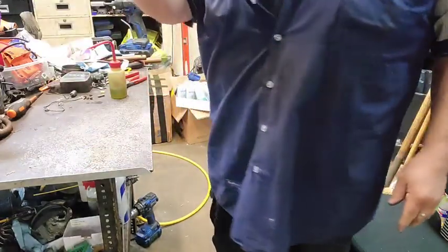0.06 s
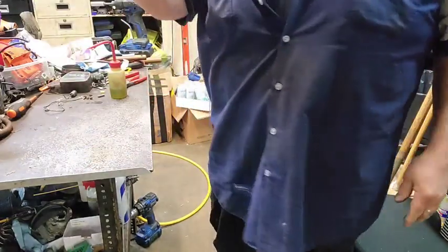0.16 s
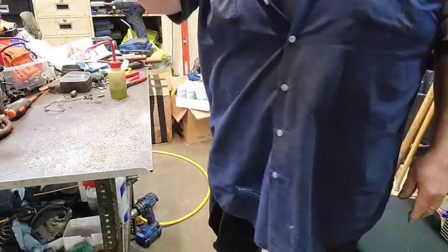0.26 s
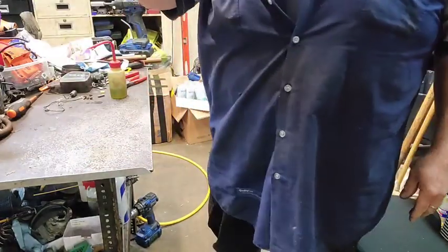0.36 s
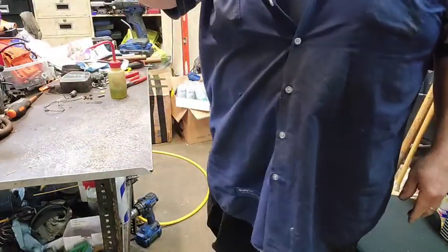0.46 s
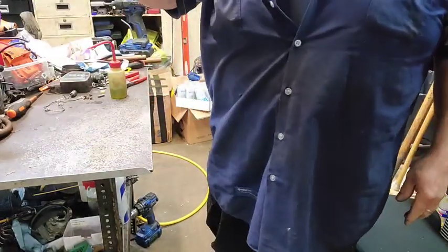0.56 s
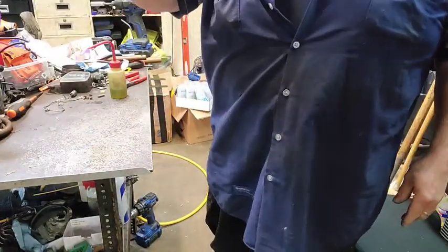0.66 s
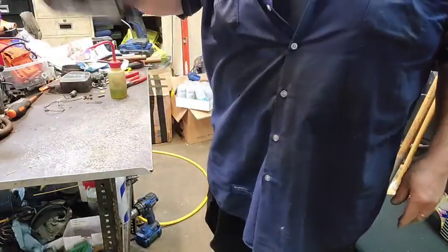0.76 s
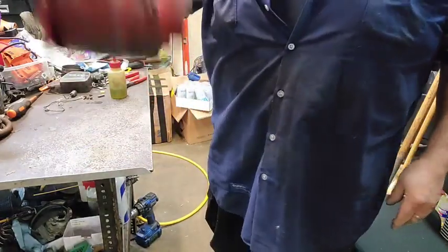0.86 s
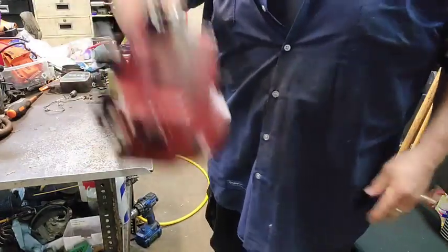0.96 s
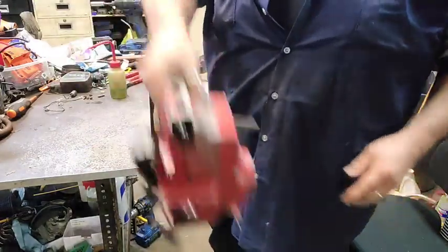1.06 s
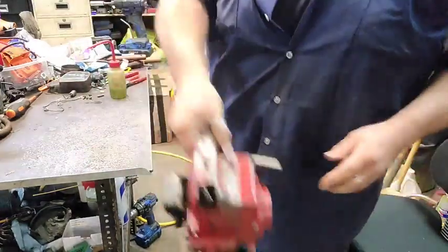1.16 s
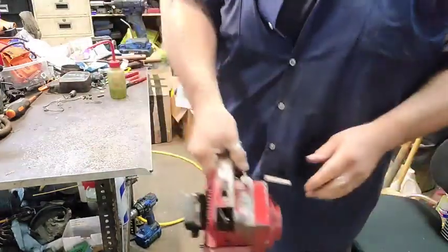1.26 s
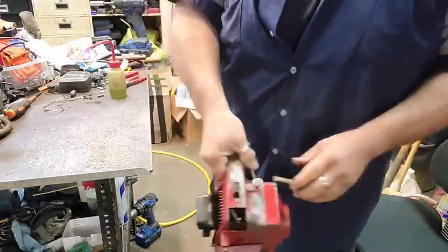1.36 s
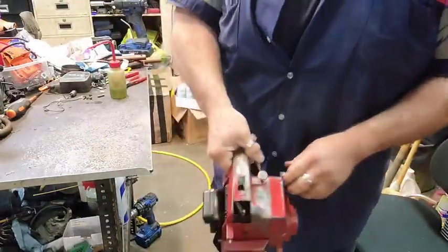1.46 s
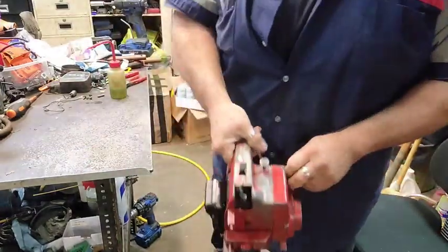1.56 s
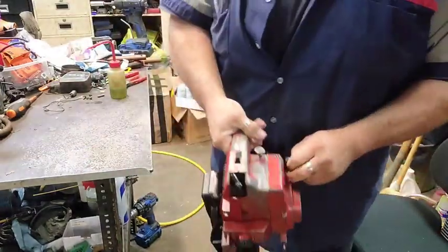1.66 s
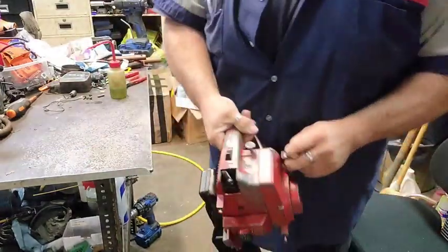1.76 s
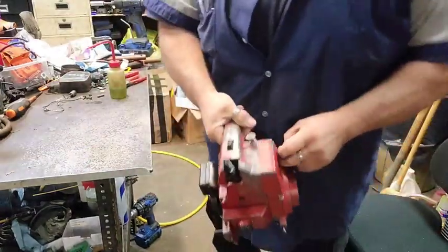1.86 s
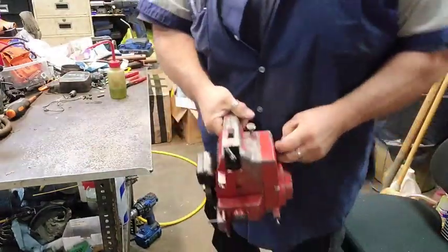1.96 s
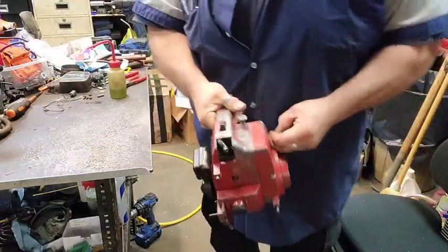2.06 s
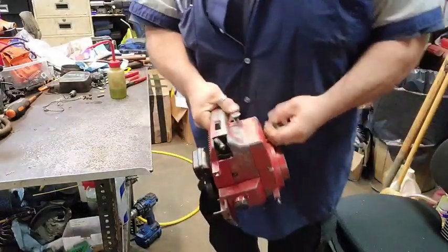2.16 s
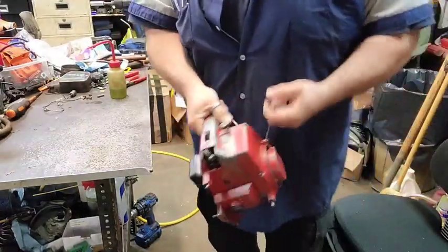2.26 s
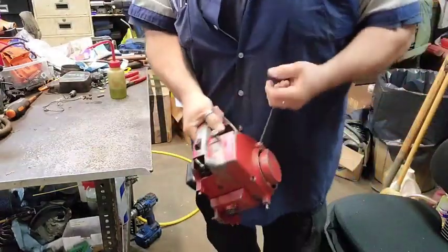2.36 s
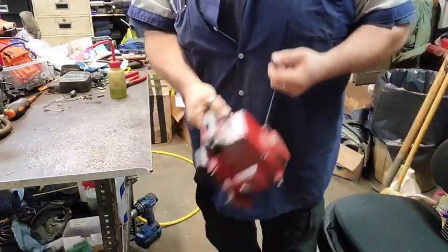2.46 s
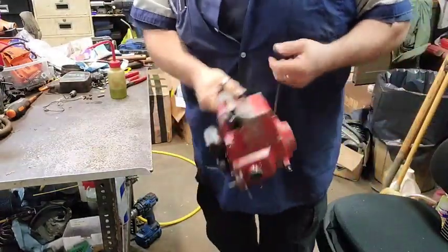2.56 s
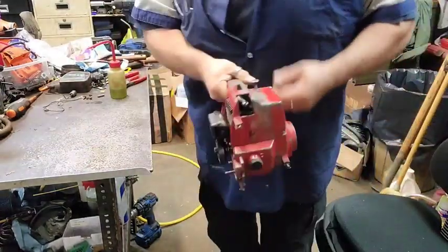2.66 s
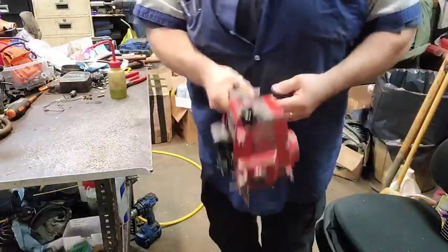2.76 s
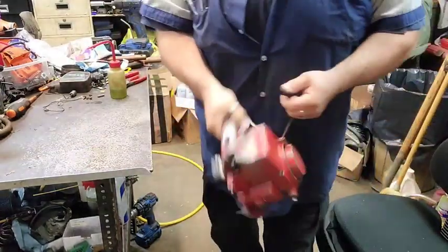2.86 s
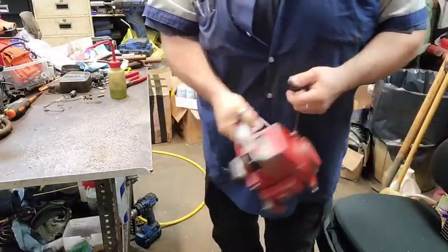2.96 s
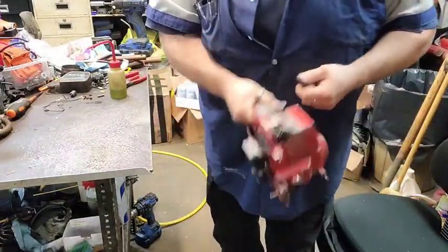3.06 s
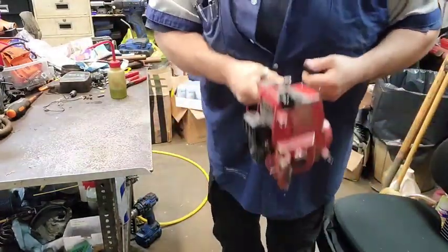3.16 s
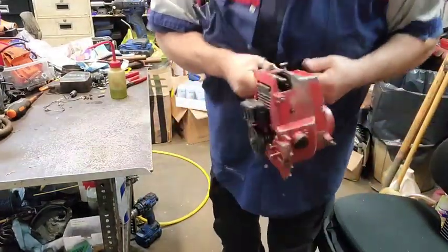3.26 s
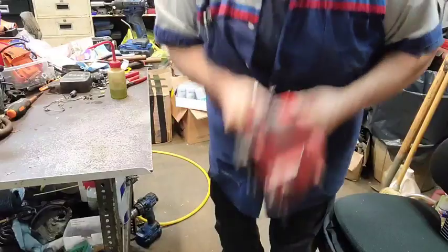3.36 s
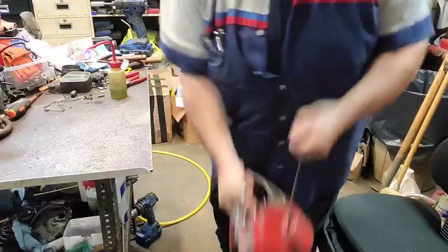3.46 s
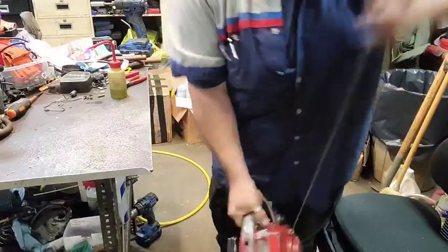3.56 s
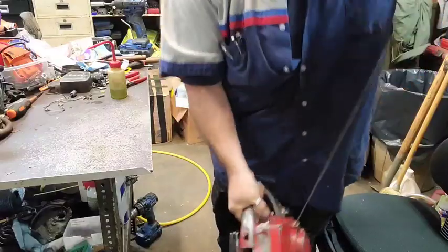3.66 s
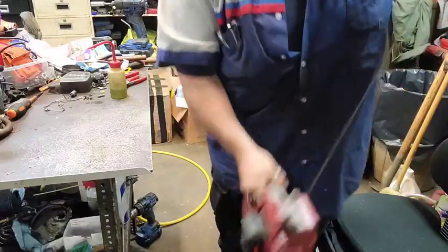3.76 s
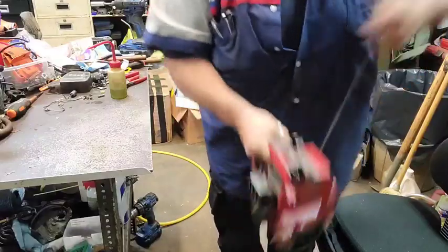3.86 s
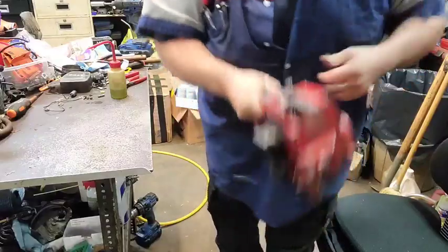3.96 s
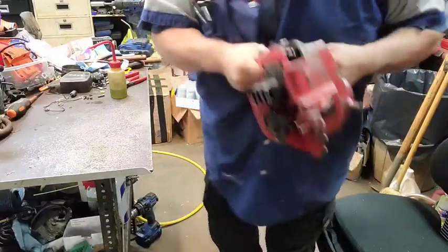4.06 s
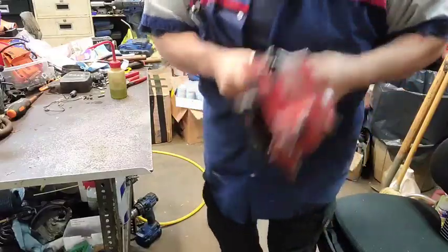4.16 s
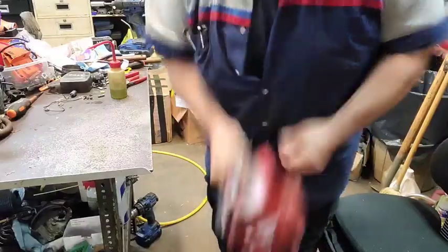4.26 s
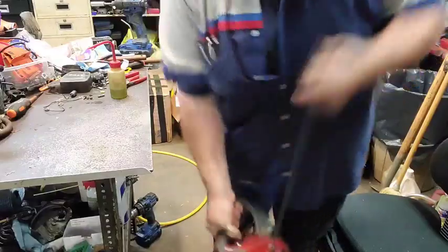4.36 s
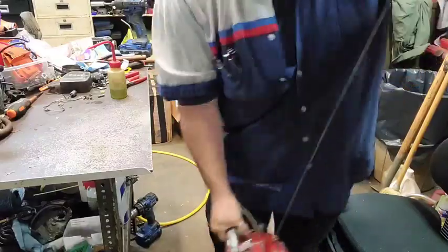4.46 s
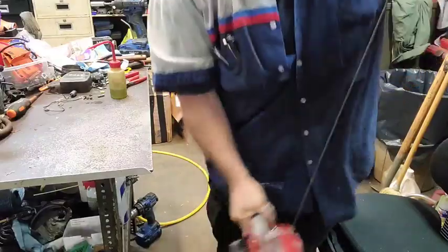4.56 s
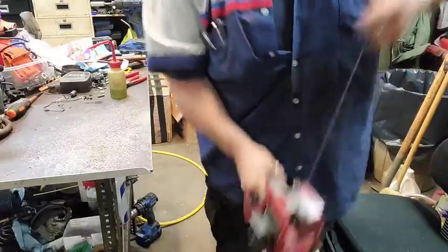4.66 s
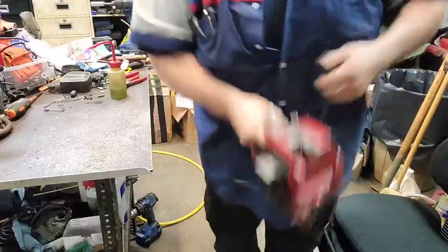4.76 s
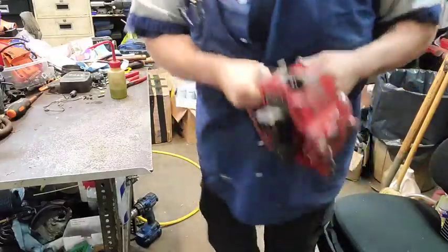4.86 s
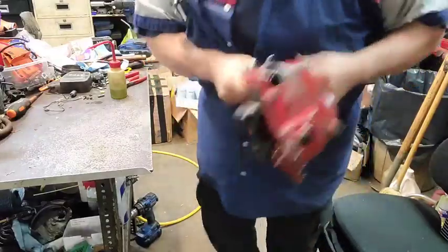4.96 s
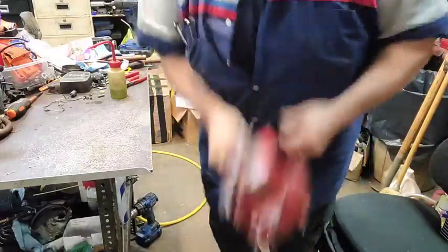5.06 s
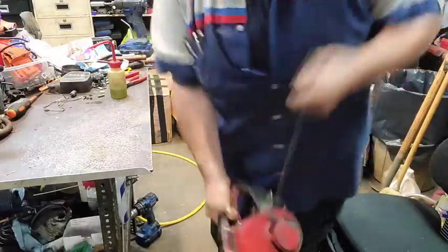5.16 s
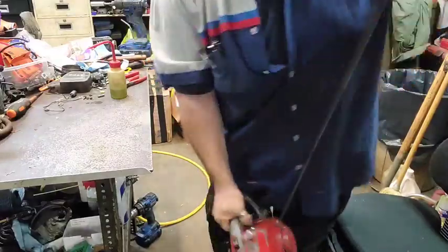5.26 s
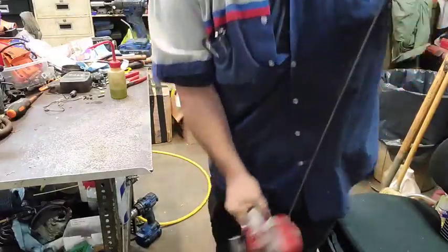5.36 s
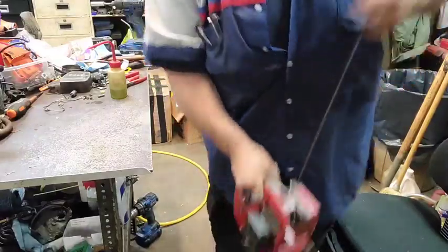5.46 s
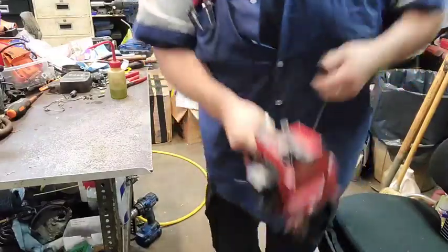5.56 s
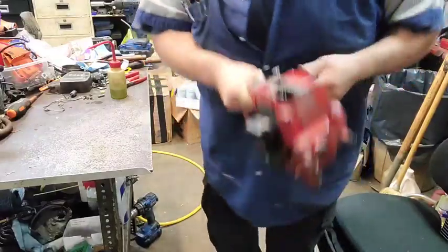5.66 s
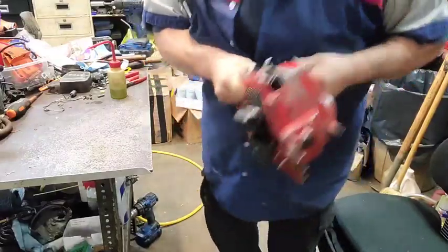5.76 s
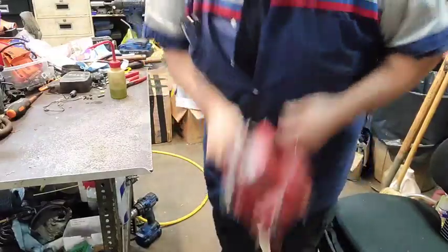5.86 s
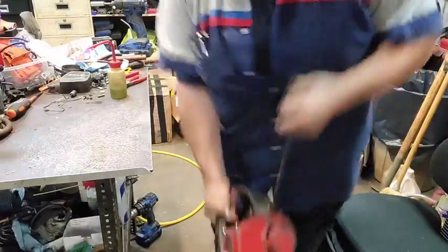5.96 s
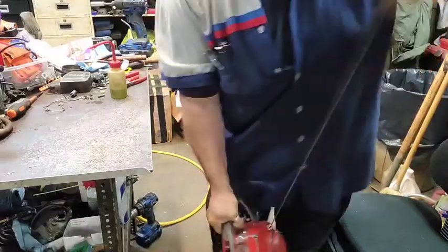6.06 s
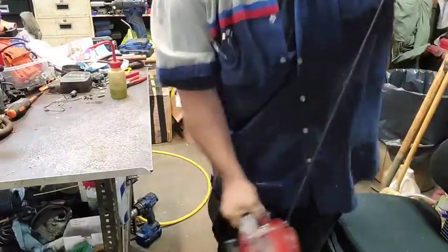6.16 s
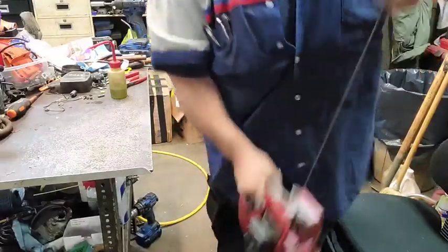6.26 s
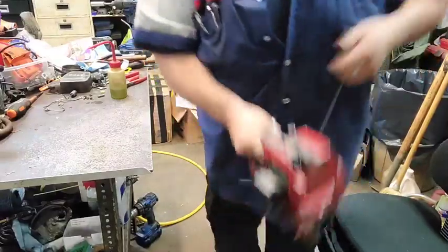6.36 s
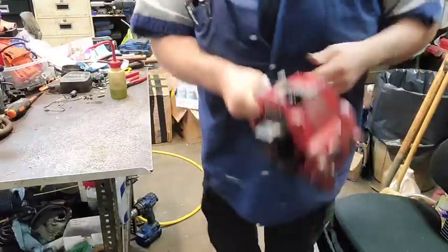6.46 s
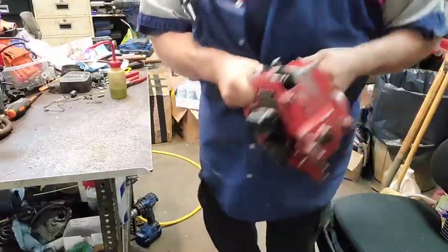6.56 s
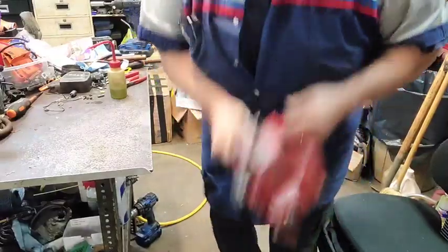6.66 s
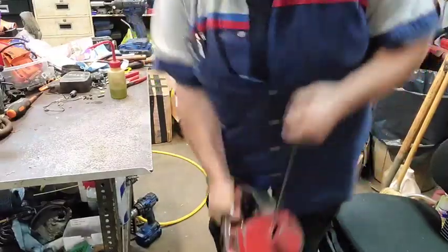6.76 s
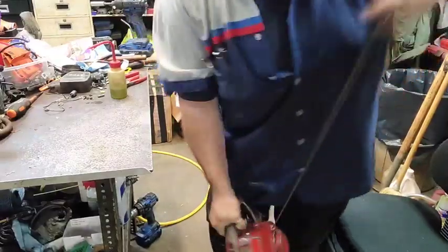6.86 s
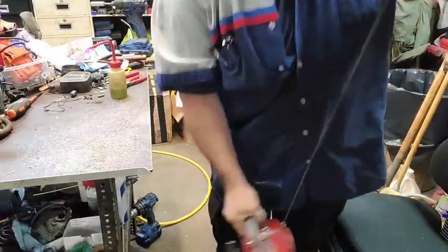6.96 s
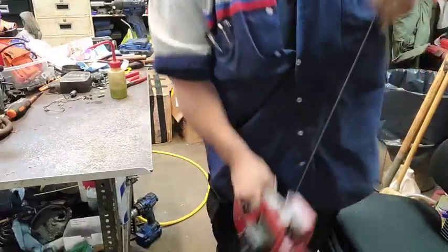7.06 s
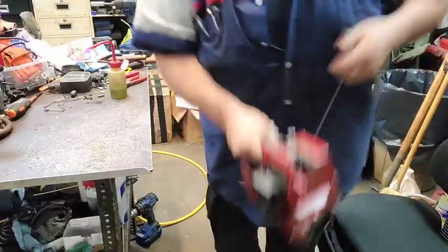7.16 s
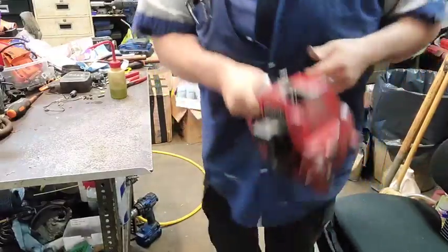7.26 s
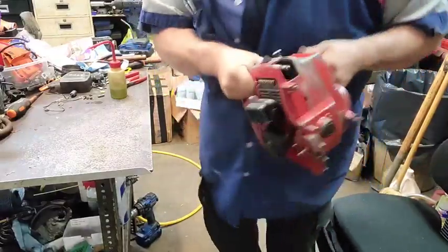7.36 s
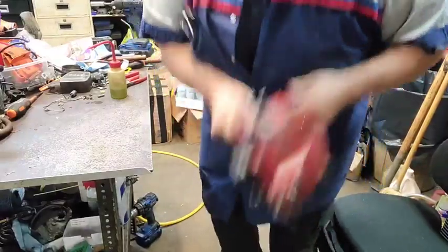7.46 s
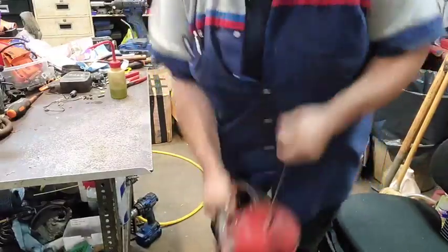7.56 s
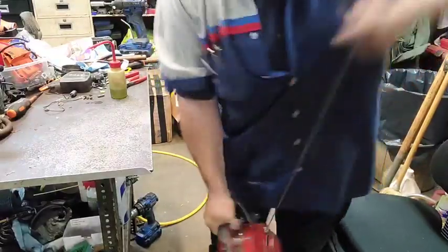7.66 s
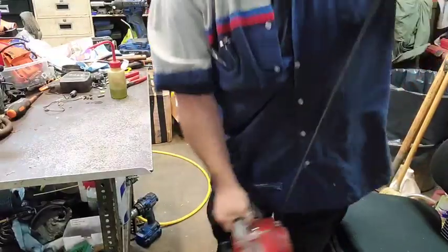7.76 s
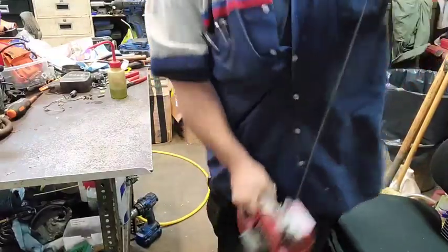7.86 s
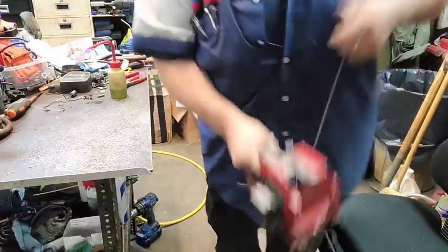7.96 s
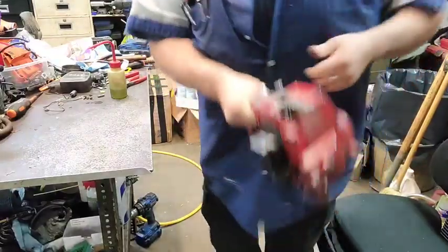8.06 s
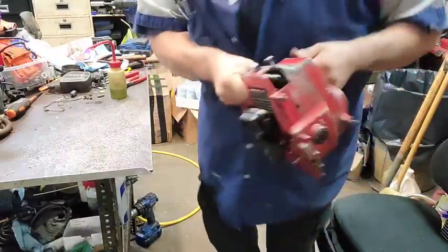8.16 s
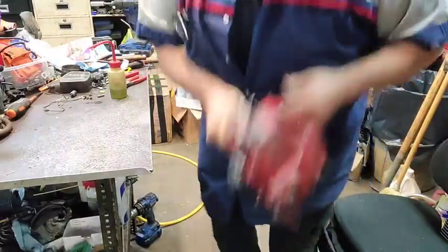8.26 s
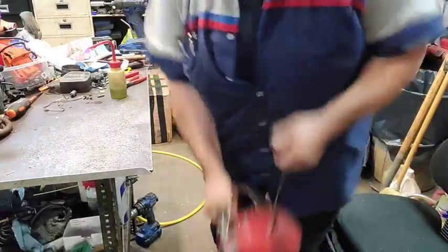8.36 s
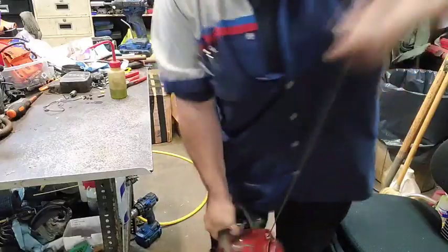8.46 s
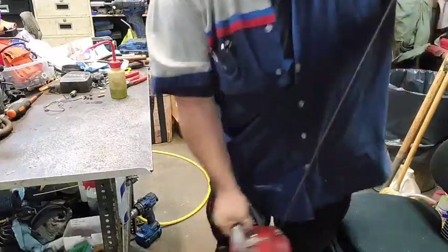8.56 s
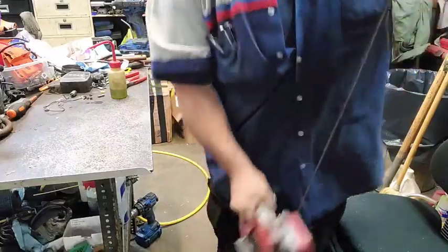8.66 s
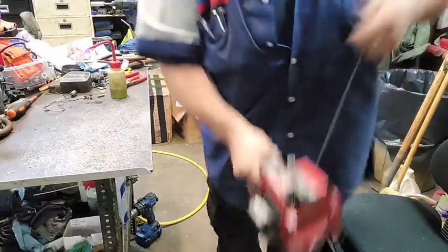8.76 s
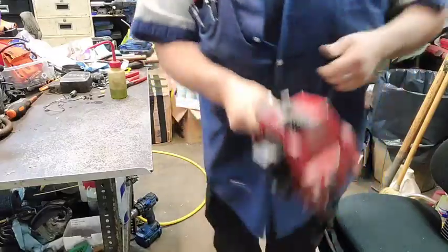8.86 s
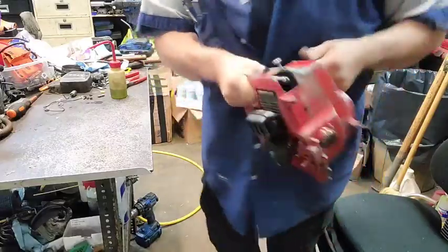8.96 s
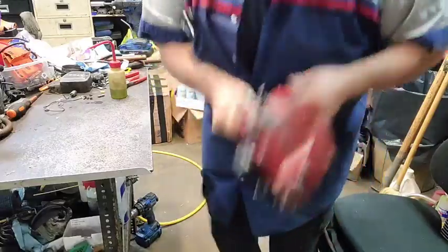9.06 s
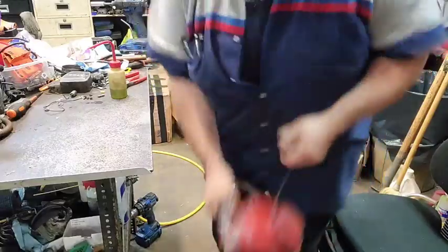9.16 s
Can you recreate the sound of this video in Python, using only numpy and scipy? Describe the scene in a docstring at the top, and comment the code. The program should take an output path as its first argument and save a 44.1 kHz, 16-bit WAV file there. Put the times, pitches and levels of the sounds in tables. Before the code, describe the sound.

A small two-stroke saw is yanked on its starter cord seven times in a workshop, clattering, chuffing and rewinding, but never starts.

```python
"""Cord-started saw, seven failed pulls

A small two-stroke saw in a workshop is pulled over seven times by its starter cord and never keeps running.
Noise bursts ring the casting and cover (knocks, reel rattle); shaped pulses ring the muffler (chuffs).
Swelling tones are whines, short sines are cord slaps; hum and room noise lie beneath.
Echoes, scatter and a workshop tail carry the saw to two microphone ports."""
import sys
import numpy as np
from scipy import signal
from scipy.fft import rfft, irfft, next_fast_len
from scipy.io import wavfile

SR = 44100
rng = np.random.default_rng(int(sys.argv[2]) if len(sys.argv) > 2 else 0)


def output_pcm(signal):
    """Save a mono or channel-first signal as 16-bit PCM at the path in sys.argv[1].

    Samples are clipped to [-1, 1] before scaling.
    """
    pcm = np.clip(np.atleast_2d(signal).T, -1, 1) * 32767
    wavfile.write(sys.argv[1], SR, np.round(pcm).astype(np.int16))


N = 406602
TIME = np.arange(N) / SR

# hum lines: pitch_hz, level_db
HUM_LINES = [(58.5, -46), (84.3, -52)]
# room noise spectrum: freq_hz, relative_density_db
AIR_SPECTRUM = [(25, -6), (45, -1.5), (120, -7), (350, -8.5), (700, -12), (1050, -19.5), (4000, -26),
                (10000, -42.5), (13000, -36), (16000, -32.5)]
# left-right likeness of the room noise: freq_hz, likeness_0_to_1
AIR_LIKENESS = [(60, 1), (400, 0.64), (1200, 0)]
AIR_DB = -47.5

# knocks of pawls, handle and housing: time_s, relative_level_db, brightest_ring_hz
KNOCK_EVENTS = [(0.115, -43, 2200), (0.157, -15.5, 5200), (1.0764, -46, 3000), (1.285, -51, 3000),
                (1.81, -41, 2700), (2.3109, -8, 6970), (2.44, -25.5, 1780), (2.59, -41.5, 2480),
                (2.765, -6, 6840), (2.9195, -5, 2630), (3.4308, -13.5, 3390), (3.5212, -9.5, 6650),
                (3.5587, -7.5, 4870), (3.587, 1, 7560), (3.6983, 3.5, 7720), (3.821, -10.5, 6860),
                (3.8946, -25, 5970), (3.919, -23, 7000), (3.941, -9, 6660), (4.0236, -8.5, 6440),
                (4.1265, -13.5, 6200), (4.147, -16, 2980), (4.369, -3, 6350), (4.4022, -12, 4930),
                (4.427, 2.5, 7590), (4.525, -0.5, 7220), (4.692, -4, 6700), (4.7245, -14, 6600),
                (4.7472, -8, 7250), (4.8196, -14, 6600), (4.8606, -13.5, 6440), (4.9636, -30.5, 5000),
                (5.025, -18.5, 6800), (5.1547, -20.5, 3100), (5.204, -7.5, 5500), (5.217, -6, 7640),
                (5.351, 0, 7600), (5.527, -15.5, 5770), (5.5707, -17.5, 6540), (5.6083, -11.5, 3280),
                (5.6395, -10, 6750), (5.687, -12, 6500), (5.72, -17.5, 6650), (5.787, -14.5, 6680),
                (5.965, -22.5, 6440), (6.025, -16.5, 6380), (6.0408, -3, 6840), (6.0736, 0.5, 7230),
                (6.154, 2.5, 7830), (6.2917, -9, 6600), (6.3274, -13, 6640), (6.4063, -17, 6500),
                (6.533, -16, 3820), (6.588, -12.5, 3760), (6.792, -9.5, 6850), (6.8485, 0.5, 7400),
                (6.9662, 4, 7580), (7.1586, -27, 6460), (7.206, -19.5, 6600), (7.357, -12.5, 6760),
                (7.4386, -12, 7060), (7.6045, -22, 6200), (7.651, -16.5, 6300), (7.668, -6, 6140),
                (7.6968, 0.5, 7300), (7.7704, 3.5, 7700), (7.9129, -12, 6770), (8.0714, -12, 6100),
                (8.1274, -11.5, 6170), (8.2135, -14.5, 6460), (8.4132, -5.5, 7100), (8.4645, 2.5, 7330),
                (8.5796, 4.5, 7630), (8.7187, -10, 6240), (8.762, -10.5, 6400), (8.839, -18, 6150),
                (8.8922, -6, 5410), (9.0117, -12, 6830)]
KNOCK_T60_S, SQUEAK_T60_S = 0.11, 0.14
# rings of the casting: pitch_hz, width_hz, relative_level_db
CASTING_RINGS = [(3087, 91, -3.5), (3925, 28, -2.5), (5450, 53, -6), (6740, 310, -9.5), (7600, 240, -12),
                 (7840, 110, -13), (12640, 810, -16.5), (14280, 260, -16.5)]
# broad colour between the casting rings: freq_hz, gain_db
SCRAPE_SPECTRUM = [(710, -36.5), (1200, -1), (2360, -5.5), (3100, -4), (4210, 0.5), (7270, 0), (9760, -32),
                   (14600, -12), (16300, -17)]
# rings of the hollow starter cover: pitch_hz, width_hz (knocks and chuffs widen it), relative_level_db
COVER_RINGS = [(630, 20, -19.5), (704.4, 29.6, 0), (857, 94, -3.5), (1019, 54, -6.5), (1125, 11, -1.5)]

# reel spring winds the cord back, the first only slack: release_s, fastest_s, rattle_then_db, handle_home_s
REEL_REWINDS = [(2.613, 2.727, -40, 2.72), (3.822, 3.95, -20, 4.21), (4.694, 4.754, -24.5, 5.02),
                (5.49, 5.638, -23.5, 5.75), (6.291, 6.43, -21.5, 6.48), (7.148, 7.266, -23, 7.335),
                (7.911, 8.018, -25.5, 8.05), (8.727, 8.845, -22, 9)]
SPIN_UP_DB_PER_S, RUN_DOWN_DB_PER_S = 100.5, 104.5
# cord drawn out: pawls_catch_s, rattle_db, pops_db
CORD_DRAWS = [(3.53, -29, -5), (4.38, -30, -7.5), (5.211, -26.5, -6.5), (6.033, -28.5, -8),
              (6.807, -31.5, -7.5), (7.661, -29, -8.5), (8.422, -38, -8)]
DRAW_S, SETTLE_DB_PER_S = 0.16, 164  # steady while the arm travels, then it dies
# cord and spring snag now and then
SNAGS_PER_S, SNAG_DECAY_S, SNAG_DB = 70, 0.003, 5

# swells of thin metallic tones: time_s, level_db, pitch_hz
WHINE_SWELLS = [(2.811, -44.5, 3920), (4.621, -37, 5460), (5.501, -36, 5520), (5.898, -50, 5400),
                (7.089, -39.5, 5480), (7.42, -45, 3940), (7.86, -54, 5480), (8.562, -31, 5525),
                (8.66, -39.5, 5480)]

# one row a pull: first_compression_s, speed_turns_per_s, arm_push_(turns/s)^2_per_turn,
# cord_length_turns, compressions_count
CRANK_PULLS = [(3.5752, 25.51, 534, 1.77, 7), (4.4279, 29.57, 446.5, 2.79, 8),
               (5.2515, 28.04, 316.7, 2.22, 7), (6.0592, 29.53, 392, 2.25, 7),
               (6.8696, 29.01, 370.8, 2.13, 7), (7.6833, 30.12, 474.7, 1.49, 8),
               (8.4855, 30.33, 381.6, 2.18, 6)]
DRAG_PER_TURN, SLOWEST_TURNS_PER_S = 294, 12.13  # drag in (turns/s)^2
REFERENCE_TURN_S = 0.027
SLOW_DB_PER_HALVING = 5.5  # a slow crank pops less
LEAK_DB, LEAKS_FROM = 10.5, 2.7  # a crawling one leaks: dB per reference turn, beyond this many
GAS_DB, JOLT_DB = 0.5, -2.5  # escaping gas; cover jolted by each chuff
# muffler rings: pitch_hz, width_hz, relative_level_db
MUFFLER_RINGS = [(86.6, 17, -1.5), (121, 49, -1), (177, 18, -6), (313, 27, -20), (440, 113, -0.5),
                 (568, 102, -4), (957, 16, -17)]

# slack cord slaps the hollow cover: time_s, level_db, pitch_hz
CORD_SLAPS = [(3.944, -12.5, 1067), (4.805, -21.5, 896), (8.894, -21, 1000)]
SLAP_S = 0.018

# reflections off body, bench, floor and walls: delay_s, signed_gain
EARLY_ECHOES = [(.003, 0.22), (.005, 0.2), (.0099, 0.2), (0.013, 0.11), (0.018, -.15), (.0225, -0.18)]
# workshop decay: freq_hz, t60_s
SHOP_DECAY = [(150, 0.19), (2000, 0.43), (16000, 0.25)]
# level difference of the saw between ports: freq_hz, left_minus_right_db
SAW_BALANCE = [(60, -1.5), (950, -1.5), (15000, 3.5)]
PORT_LAG_S = 0.00012  # the saw reaches the left port first
EDGE_HZ = 15790


def gain_of(db):
    """Amplitude factor for a level in dB."""
    return 10 ** (np.asarray(db) / 20)


def evened(x):
    """Scales to rms 1."""
    return x / np.sqrt(np.mean(x ** 2) + 1e-20)


def read(points, hz):
    """Interpolates a table over log frequency."""
    f, value = np.transpose(points)
    return np.interp(np.log(hz + 1), np.log(f + 1), value)


def add(mix, s, sound):
    """Adds a sound into the mix at s seconds."""
    part = mix[round(s * SR):][:len(sound)]
    part += sound[:len(part)]


def resonate(x, hz, width_hz):
    """One two-pole ring of gain 1 at its centre."""
    return signal.lfilter(*signal.iirpeak(hz, hz / width_hz, SR), x)


def ring_bank(x, rings, widen=1.0):
    """Parallel two-pole rings, the modes of one part."""
    return sum(gain_of(db) * resonate(x, hz, widen * width) for hz, width, db in rings)


def coloured(x, points, lag_s=0.):
    """Applies a spectrum in dB and a small delay."""
    size = next_fast_len(N + 4096)
    hz = np.fft.rfftfreq(size, 1 / SR)
    delay = np.exp(-2j * np.pi * hz * lag_s)
    return irfft(rfft(x, size) * gain_of(read(points, hz)) * delay, size)[:N]


def drift(per_s):
    """Slow random wander of rms 1, fading above per_s Hz."""
    hz = np.fft.rfftfreq(N, 1 / SR)
    return evened(irfft(rfft(rng.standard_normal(N)) / (1 + (hz / per_s) ** 4), N))


def background():
    """Wavering hum lines of a machine over soft room noise, partly alike at the two ports."""
    frames, hz = N // 512 + 5, np.fft.rfftfreq(2048, 1 / SR)
    a, b, c, d = rng.standard_normal((frames, 1025, 4)).T
    left, other = a + 1j * b, c + 1j * d
    same = np.clip(read(AIR_LIKENESS, hz), 0, 1)[:, None]
    z = np.array([left, same * left + np.sqrt(1 - same ** 2) * other])
    z *= gain_of(read(AIR_SPECTRUM, hz))[:, None] * gain_of([[[-.8]], [[.8]]])
    air = gain_of(AIR_DB) * evened(signal.istft(z, nperseg=2048, noverlap=1536)[1][:, :N])

    lag_s = np.array([[.0005], [0]])  # the hum reaches the right port first
    hum = np.zeros((2, N))
    for pitch_hz, db in HUM_LINES:
        level = gain_of(db + 1.1 * drift(1.4)) * np.sqrt(2)
        cycles = pitch_hz * (TIME - lag_s) + 0.017 * drift(1.9) + rng.random()
        hum += level * np.sin(2 * np.pi * cycles)
    return air + hum * gain_of([[-1.2], [1.2]])


def casting(x, rings_db=8, flash_db=4.0):
    """Metal body: broad scrape with rings above; each ring flashes as contacts wander over the part."""
    rings = np.zeros(N)
    for hz, width, db in CASTING_RINGS:
        rings += gain_of(db) * resonate(x * gain_of(flash_db * drift(8.5)), hz, width)
    return coloured(x, SCRAPE_SPECTRUM) + gain_of(rings_db) * rings


def knocks():
    """A soft onset, a sharp crack and a dying burst of contacts ring casting and cover; one ring is local."""
    t = np.arange(-600, SR // 4) / SR
    after = np.maximum(t, 0)
    tick, near = np.zeros((2, N))
    noise = rng.standard_normal((len(KNOCK_EVENTS), len(t)))
    for (s, db, hz), n in zip(KNOCK_EVENTS, noise):
        t60_s, rise_s = (SQUEAK_T60_S, .005) if hz > 7100 else (KNOCK_T60_S, .0006)
        lead_in = .05 * np.exp(t / .004)
        rise = np.where(t < 0, lead_in, np.minimum(.05 + t / rise_s, 1))
        decay = 0.45 * gain_of(-60 * after / t60_s) + 0.6 * np.exp(-after / 0.0014)
        blow = gain_of(db) * decay * rise * n
        solid = np.clip((8200 - hz) / 1800, .15, 1)  # the shrillest are pawl squeaks that barely shake the body
        width_hz = 900 + 900 * solid ** 2  # a solid blow is a broad crack
        add(tick, s + t[0], solid * blow)
        damped = blow * gain_of(-solid * 610 * after)
        local = resonate(resonate(damped, hz, width_hz), hz, width_hz)
        half_pitch = 1.06 * (1 - solid) * resonate(blow, hz / 2, 160)
        add(near, s + t[0], local + half_pitch)
    bare_contact = signal.lfilter(*signal.butter(2, (700, 16000), "band", fs=SR), tick)
    cover = ring_bank(tick, COVER_RINGS, 2.64)
    body = casting(tick, rings_db=5, flash_db=6.5)
    return gain_of(-4.5) * body + gain_of(4.5) * near + gain_of(-14.0) * bare_contact + gain_of(2.5) * cover


def rattle():
    """Gain of the reel noise, and how near (0-1) the returning handle is to home."""
    level, late = np.zeros((2, N))
    for start, db, _ in CORD_DRAWS:
        attack = np.clip((TIME - start) / 0.0048, 0, 1)
        settling_s = np.clip(TIME - start - DRAW_S, 0, 1)
        level += attack * gain_of(db - SETTLE_DB_PER_S * settling_s)
    for start, fastest, db, home in REEL_REWINDS:
        on = np.clip(np.minimum(TIME - start, home - TIME) / 0.004, 0, 1)
        slope = np.where(TIME < fastest, SPIN_UP_DB_PER_S, RUN_DOWN_DB_PER_S)
        level += on * gain_of(db - slope * np.minimum(abs(TIME - fastest), 1))
        late += on * np.clip(1 - (home - TIME) / .25, 0, 1)
    return level, late


def starter():
    """Uneven ticks of reel, spring and cord, in clumps and snags; the cover rings lower near the handle's home."""
    level, late = rattle()
    sizes = gain_of(1.08 * np.minimum(rng.exponential(1, N), 5))
    ticks = sizes * rng.choice([-1, 1], N) * (rng.random(N) < 1500 / SR)
    snags = gain_of(SNAG_DB + 0.73 * rng.standard_normal(N)) * (rng.random(N) < SNAGS_PER_S / SR)
    snags = signal.lfilter([1], [1, -np.exp(-1 / (SNAG_DECAY_S * SR))], snags)
    grain = evened(evened(ticks) + .5 * rng.standard_normal(N))
    drive = level * grain * gain_of(1.76 * drift(27)) * evened(1 + snags)
    thumps = drive * gain_of(3.7 * drift(78))
    cover = np.zeros(N)
    for hz, width, db in COVER_RINGS:
        tilt_db = 29 * (late - 1.03) * np.log2(hz / 900)
        cover += gain_of(db) * resonate(thumps * gain_of(4.1 * drift(7.1) - tilt_db), hz, width)
    return gain_of(4.0) * casting(drive) + gain_of(10.5) * cover


def whine():
    """Narrow, slightly rough tones under soft swells: noise through two sharp rings."""
    t, out = np.arange(-.25, .25, 1 / SR), np.zeros(N)
    noise = rng.standard_normal((len(WHINE_SWELLS), len(t)))
    for (s, db, hz), n in zip(WHINE_SWELLS, noise):
        tone = evened(resonate(resonate(n, hz, 35), hz, 35))
        add(out, s + t[0], gain_of(db) * np.exp(-(t / 0.05) ** 2) * tone)
    return out


def chuffs():
    """Time_s, turn_s and pop_db of each compression: the arm feeds the crank, compression drains it."""
    out = []
    for (first, speed, push, cord, count), (_, _, db) in zip(CRANK_PULLS, CORD_DRAWS):
        k = np.arange(count - 2)
        gained = push * np.maximum(1 - (k / cord) ** 2, 0) - DRAG_PER_TURN
        speed_squared = speed ** 2 + np.cumsum(np.r_[0, gained])
        turn_s = 1 / np.sqrt(np.maximum(speed_squared, SLOWEST_TURNS_PER_S ** 2))
        times = first + np.cumsum(np.r_[0, turn_s])
        out += zip(times, np.r_[turn_s[0], turn_s], np.full(count, db))
    return np.transpose(out)


def engine():
    """Each chuff sucks, pops and rebounds through the muffler, with a ragged gust of escaping gas."""
    t = np.arange(-300, 2500) / SR
    pops, gusts = np.zeros(N), np.zeros(N)
    suck, rebound = (np.exp(-((t - at) / .0008) ** 2) for at in (-.0016, .0017))
    gust = np.exp(-abs(t) / np.where(t < 0, .002, .02))
    times, turns_s, pops_db = chuffs()
    chance = rng.standard_normal((len(times), 2))
    for s, slow, pop_db, (a, b) in zip(times, turns_s / REFERENCE_TURN_S, pops_db, chance):
        loss_db = SLOW_DB_PER_HALVING * np.log2(slow) + LEAK_DB * max(slow - LEAKS_FROM, 0)
        size = gain_of(pop_db - loss_db + a)
        width_s = 0.00043 * gain_of(b)
        pop = np.exp(-abs(t / width_s) ** 1.76)
        add(pops, s + t[0], size * (pop - 0.32 * suck - 0.6 * rebound))
        add(gusts, s + t[0], size * gust)
    gas = gusts * rng.standard_normal(N) * gain_of(GAS_DB)
    out = pops + ring_bank(gas + 0.83 * pops, MUFFLER_RINGS)
    out += gain_of(JOLT_DB) * ring_bank(gas + 2.1 * pops, COVER_RINGS, 1.09)
    # too small a port for deep bass
    return signal.sosfilt(signal.butter(3, 47, "high", fs=SR, output="sos"), out)


def slaps():
    """A short hollow note that swells, sags a little in pitch and stops."""
    t, out = np.arange(0, SLAP_S, 1 / SR), np.zeros(N)
    for s, db, hz in CORD_SLAPS:
        note = np.sin(2 * np.pi * hz * t * (1 - 2.5 * t))
        add(out, s, gain_of(db) * np.sin(np.pi * t / SLAP_S) * note)
    return out


def scatter(x, turns_per_s=3.5):
    """Hands, body and phone case bounce treble along short paths to each port, changing as the saw swings."""
    t = np.arange(600) / SR
    paths = rng.standard_normal((3, 2, 600)) * np.exp(-t / 0.0023)
    paths = signal.lfilter(*signal.butter(2, 1900, "high", fs=SR), paths)
    paths /= np.linalg.norm(paths, axis=2, keepdims=True)
    phase = turns_per_s * TIME + np.arange(3)[:, None] / 3
    share = np.sqrt(2 / 3) * np.cos(2 * np.pi * phase)
    return sum(signal.oaconvolve((w * x)[None], p)[:, :N] for w, p in zip(share, paths))


def shop(x):
    """Workshop tail: sparse taps of random sign, each band dying at its own speed."""
    taps = np.zeros((2, SR // 2))
    start = np.arange(200, SR // 2 - 20, 20)
    at = start + rng.integers(0, 20, (2, len(start)))
    np.put_along_axis(taps, at, rng.choice([-1., 1.], at.shape), 1)
    hz, t, z = signal.stft(taps, SR, nperseg=256)
    alike = np.clip(1 - (hz / 1400) ** 2, 0, 1)[:, None]  # long waves reach both ports alike
    z[1] = alike * z[0] + np.sqrt(1 - alike ** 2) * z[1]
    decay = gain_of(-60 * t / read(SHOP_DECAY, hz)[:, None])
    tail = signal.istft(z * decay, SR, nperseg=256)[1]
    return signal.fftconvolve(x[None], tail / np.linalg.norm(tail[0]), axes=1)[:, :N]


def scene():
    """Saw with echoes, scatter and workshop tail at two ports, over the background."""
    room = background()
    clatter = knocks() + starter() + whine() + slaps()
    exhaust = engine()
    # for the first second the saw is held high and behind, which dulls it
    dulled = signal.sosfilt(signal.butter(6, 7400, fs=SR, output="sos"), clatter)
    saw = exhaust + np.where(TIME < 1, dulled, clatter)
    early = saw.copy()
    for delay_s, gain in EARLY_ECHOES:  # only the exhaust comes back as clean echoes
        add(early, delay_s, gain * exhaust)
    left, right = early + gain_of(0.5) * scatter(early) + gain_of(-6.0) * shop(saw)
    half = np.array(SAW_BALANCE) * [1, .5]
    return np.array([coloured(left, half), coloured(right, half * [1, -1], PORT_LAG_S)]) + room


def record(dry):
    """Bass cut of the microphone, soft overload on the loudest knocks, then the band limit."""
    cut = signal.sosfilt(signal.butter(2, 38, "high", fs=SR, output="sos"), dry)
    driven = np.tanh(1.1 * cut) / 1.05
    band = signal.firwin(1023, EDGE_HZ, window=("kaiser", 11), fs=SR)
    return signal.oaconvolve(driven, band[None], "same")


dry = scene()
out = record(dry)
output_pcm(out)
```